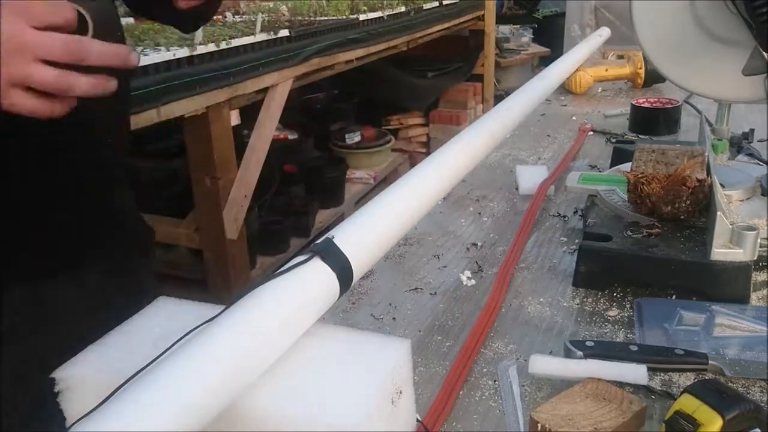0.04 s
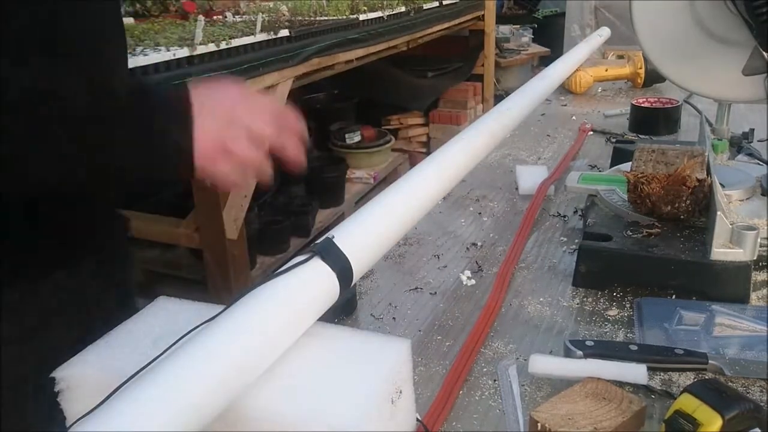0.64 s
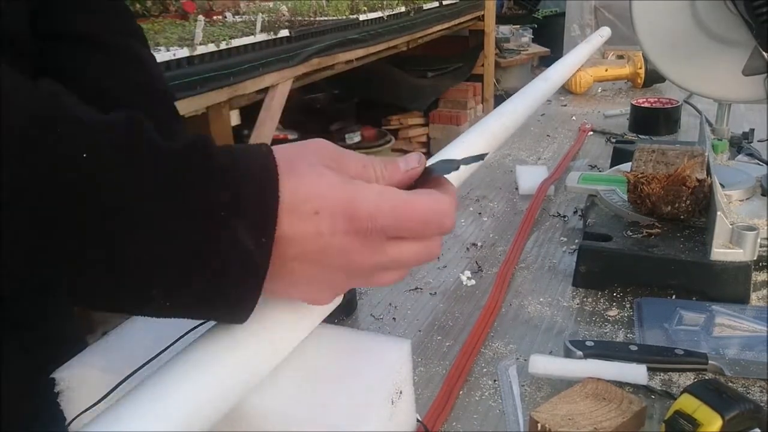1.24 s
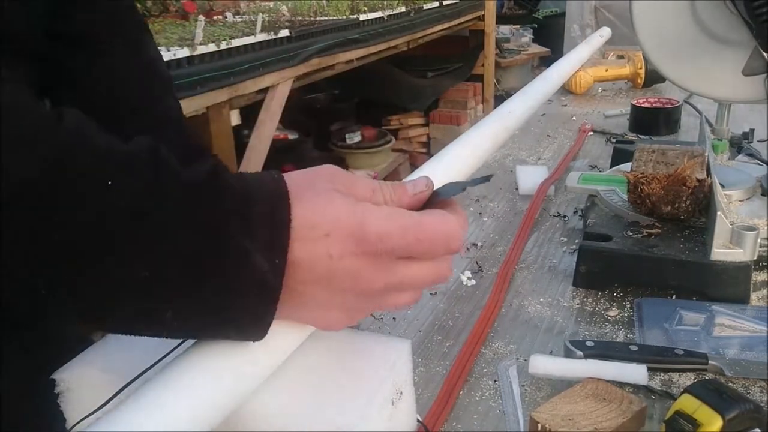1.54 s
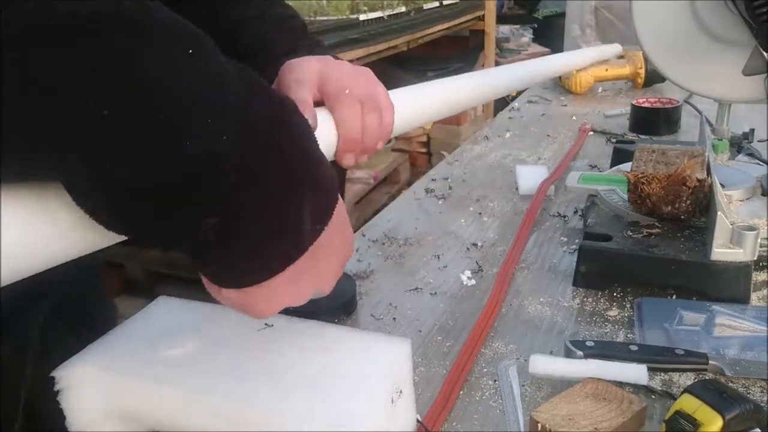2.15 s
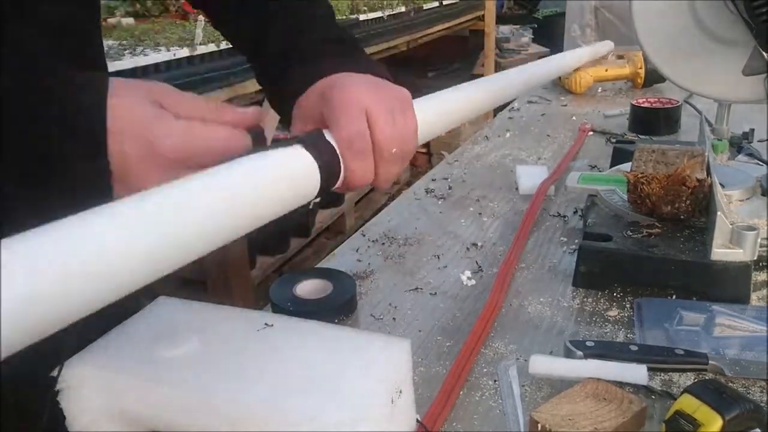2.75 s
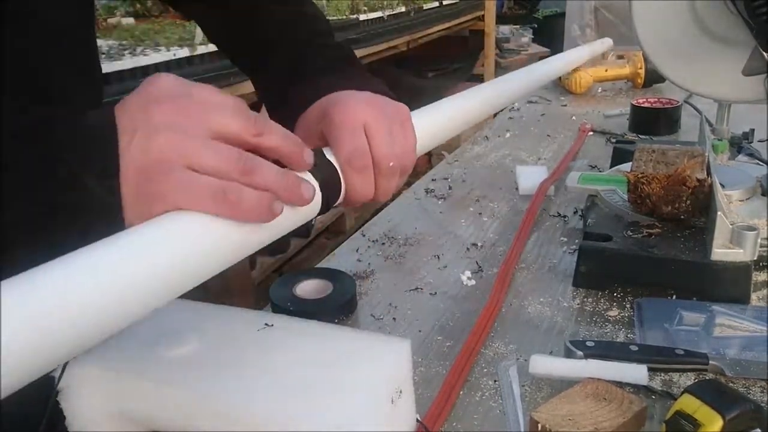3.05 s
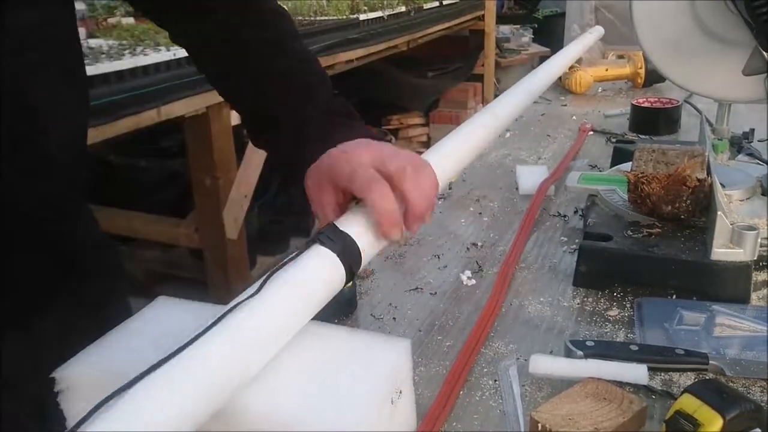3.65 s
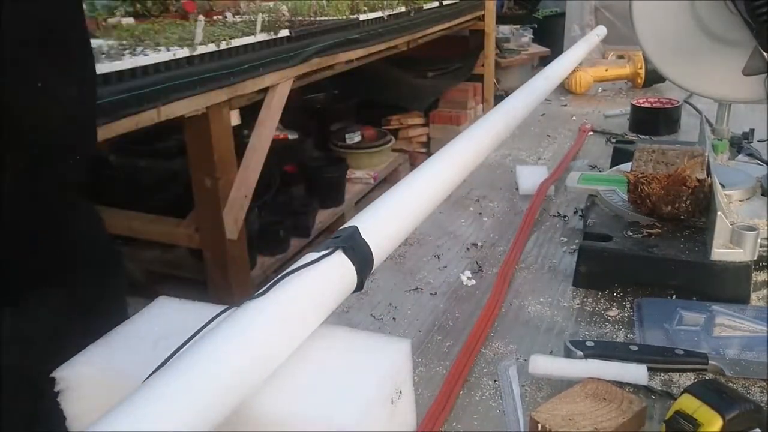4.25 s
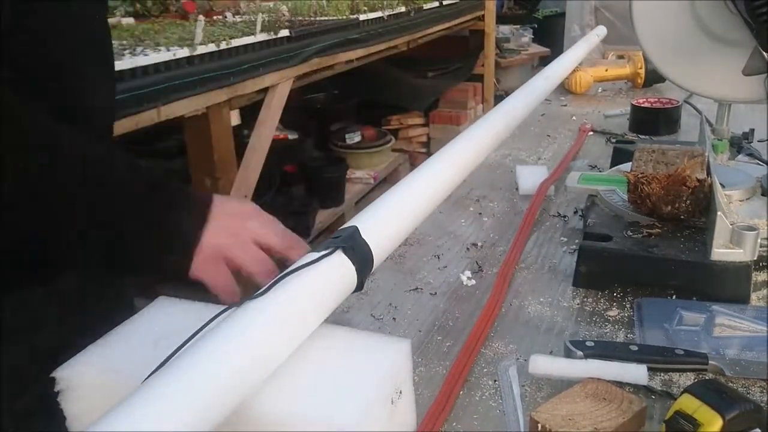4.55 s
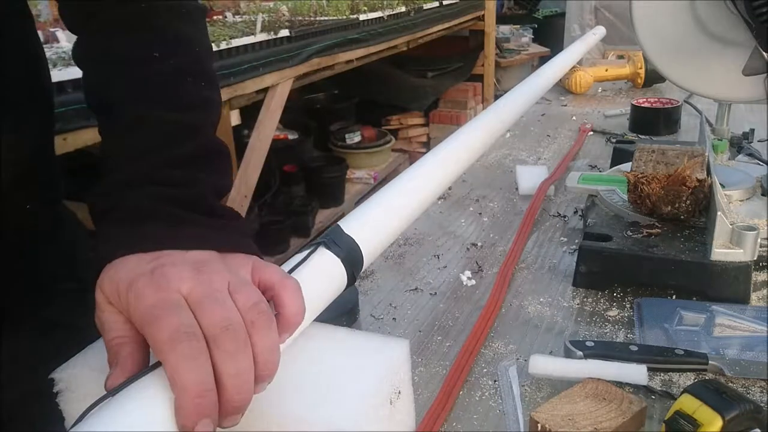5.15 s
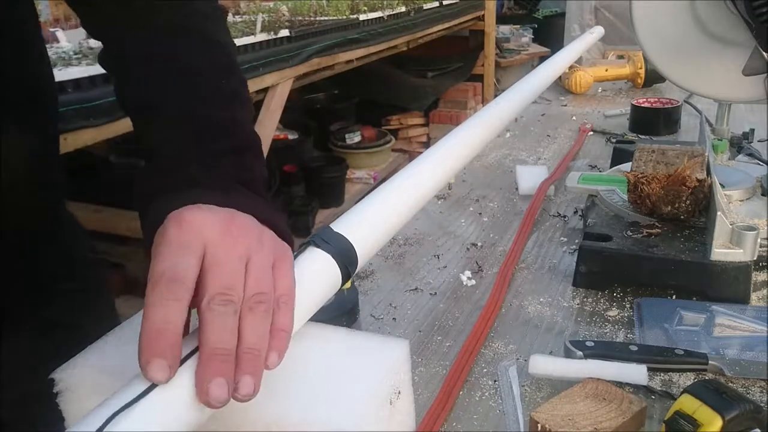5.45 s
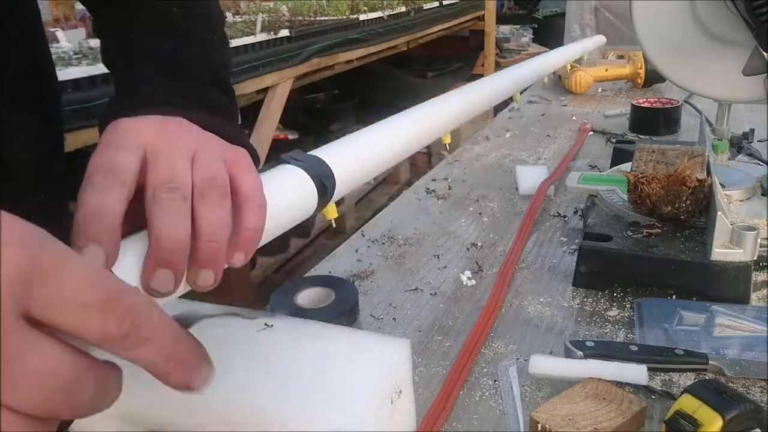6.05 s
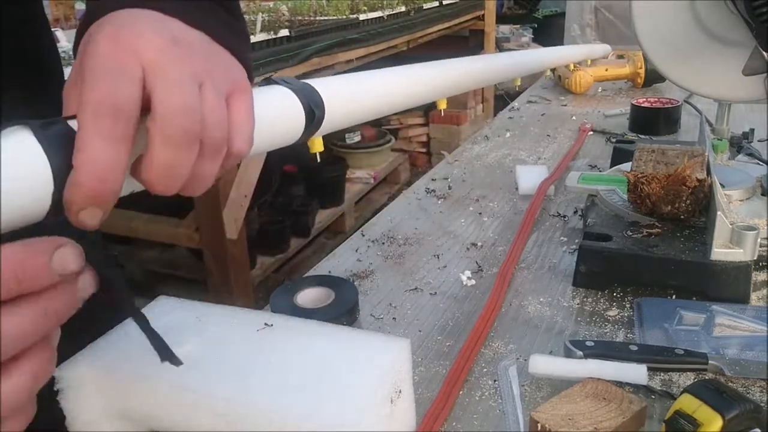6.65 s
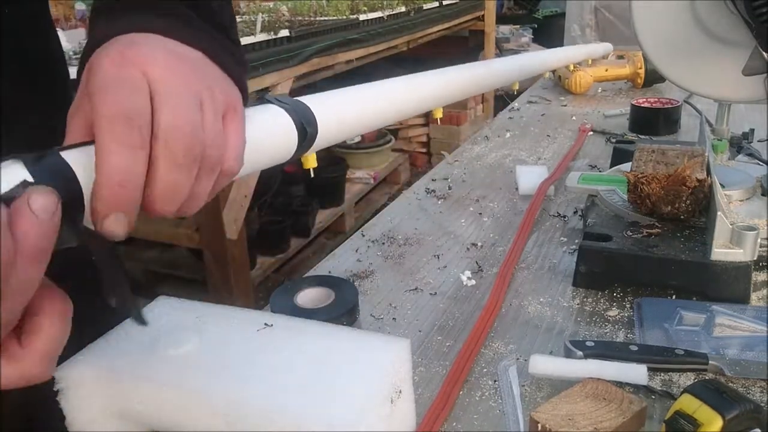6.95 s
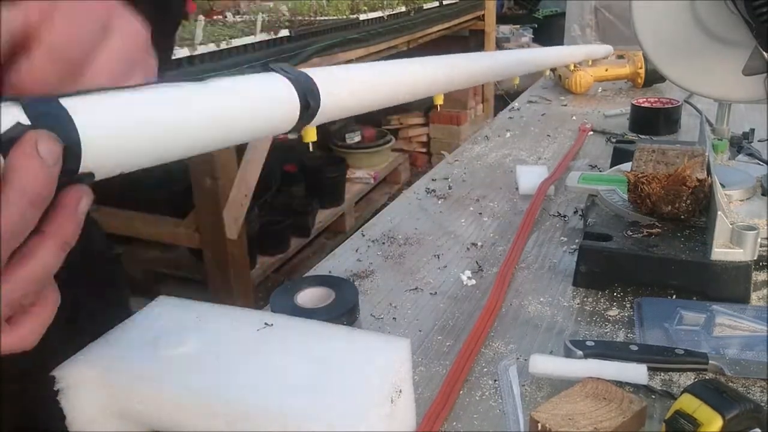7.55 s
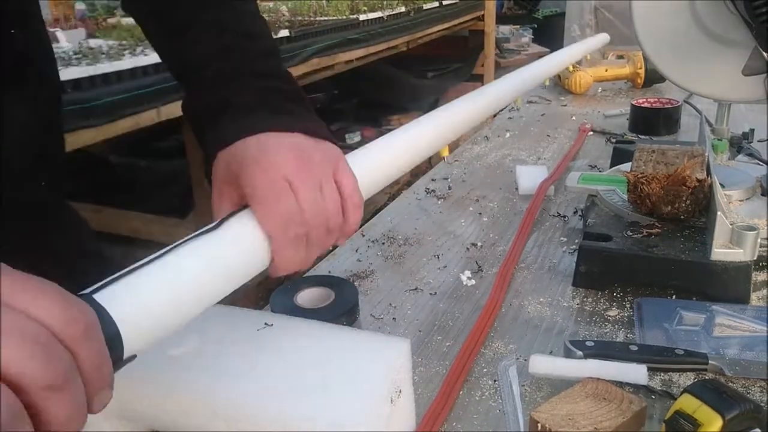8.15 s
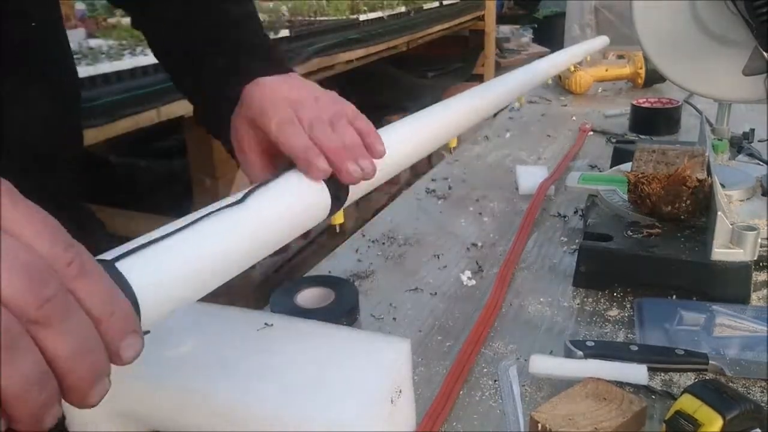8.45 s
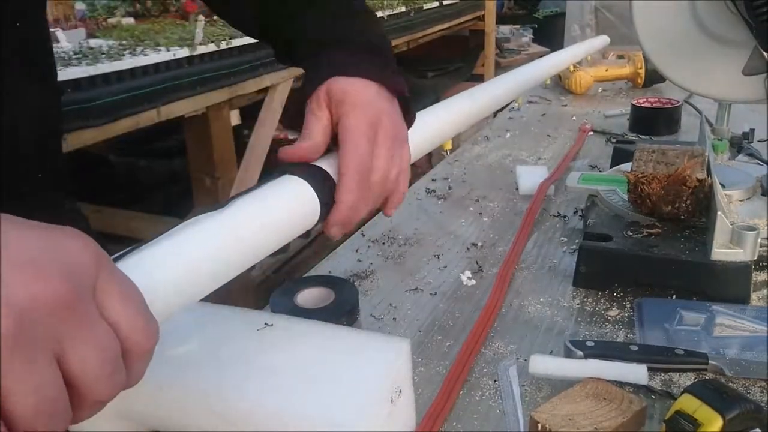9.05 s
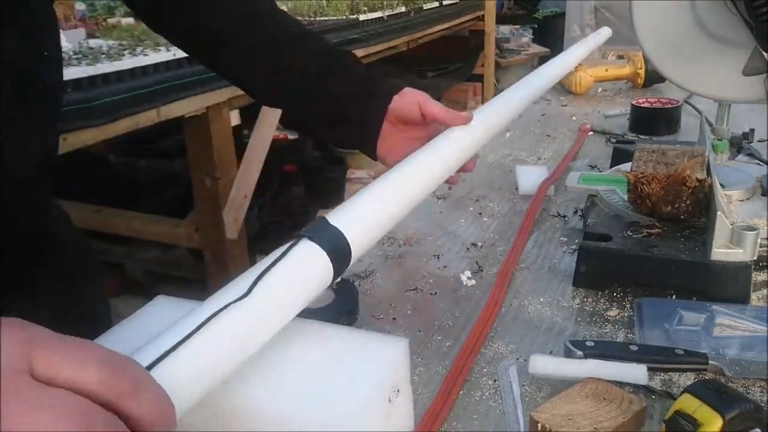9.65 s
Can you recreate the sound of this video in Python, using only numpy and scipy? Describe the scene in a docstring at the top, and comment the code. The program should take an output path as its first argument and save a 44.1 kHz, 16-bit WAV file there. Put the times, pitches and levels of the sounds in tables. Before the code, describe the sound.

Short tape rips, small clicks and two falling bird calls over faint distant traffic, ending in sharp squeaks of plastic rubbing on foam.

```python
"""Taping a plastic pipe at an outdoor workbench, over open air and distant traffic. Electrical tape
jerks off its roll, glue threads snapping; a bird gives a long falling cry as the roll drops on the
boards. Fingers press the strip round the pipe with ticks, scuffs and crinkle. Near 4 s come more rips
and a knock, near 6 s a second cry. At 9 s the pipe sticks and slips on its foam block, in short
groans and high squeals."""
import sys
import numpy as np
from scipy import signal
from scipy.fft import rfft, irfft
from scipy.io import wavfile
from scipy.ndimage import map_coordinates

SR = 44100
rng = np.random.default_rng(int(sys.argv[2]) if len(sys.argv) > 2 else 0)


def persist_wave(psi):
    """Save psi, clipped to +-1, as 16-bit WAV."""
    counts = np.round(np.clip(psi, -1, 1) * 32767).astype(np.int16)
    wavfile.write(sys.argv[1], SR, np.atleast_2d(counts).T)


N = 432180

# ring-out of the bench and nearby walls: (frequency [Hz], decay by 60 dB [s])
ECHO_DECAY = [(200, 0.22), (2000, 0.0933), (14000, 0.11)]
# EQ of the distant traffic: (frequency [Hz], gain [dB])
TRAFFIC_EQ = [(15, -66), (25, -43), (81, -40), (96, -30.5), (123, -24), (144, -12.5), (189, -3), (210, 2),
              (292, -1.5), (395, -9), (432, -6.5), (591, -17.5), (900, -27.5), (1170, -43), (1980, -120)]
# broad midrange EQ of both air and finger scuffs: (frequency [Hz], gain [dB])
HISS_EQ = [(300, -20), (600, 0.5), (1200, 1), (1900, -2.5), (2800, 0), (4200, -4), (6000, -12),
           (9000, -23.5)]
# faint gliding tones: (time [s], length [s], start pitch [Hz], end pitch [Hz], level [dB])
GLIDES = [(3.918, 0.448, 436.5, 348.5, -54), (4.70, 0.55, 560.7, 495, -62.5),
          (4.992, 0.957, 324.2, 393.7, -57.5), (6.596, 0.3588, 439, 356.2, -58.5),
          (8.5, 0.248, 2690, 2578, -58), (9.639, 0.059, 5420, 5327, -51.5)]

# the bird's short lead-in note: (time into note [s], pitch [Hz], gain [dB], roughness [0-1])
CHIP_SHAPE = [(0, 2635, -5.5, 1), (.007, 2782, -3, 0.89), (.022, 3028, 4, 0.12), (.038, 3009, 1, 0.3),
              (.048, 2800, -6, .7), (.058, 2790, -19, 1), (.08, 2794, -16.5, 0.8)]
# its long cries: (time [s], length [s], roughness of frayed end [0-1], fundamental there [dB])
BIRD_CRIES = [(0.54, 0.6813, 0.53, -59.5), (5.844, 0.6446, 0.24, -49.5)]

# fingers smoothing the tape down: (centre time [s], length [s], level [dB])
FINGER_PRESSES = [(0.147, 0.055, -60.5), (1.452, 0.79, -73.5), (2.134, 0.346, -71.5), (2.79, 0.21, -64.5),
                  (3.237, 0.099, -70), (3.6, 1, -70), (5.026, 0.274, -63), (5.59, 0.141, -61),
                  (6.423, 0.6, -71.5), (7.648, 0.33, -78.5), (8.162, 0.585, -59), (8.861, 0.352, -57.5),
                  (9.658, 0.19, -41)]
# bright EQ of crinkling tape: (frequency [Hz], gain [dB])
CRINKLE_EQ = [(2000, -8.5), (5000, -7), (8000, 1), (11000, 0.5), (15000, 0.5)]
# fingers scuffing the pipe: (time [s], length [s], level [dB])
FINGER_SCUFFS = [(1.535, 0.072, -53.5), (2.11, 0.049, -53.5), (2.729, 0.068, -52), (3.513, 0.0557, -54),
                 (3.606, 0.0606, -52), (3.722, 0.0473, -52.5), (3.849, .07, -52.5), (5.338, 0.0455, -46),
                 (5.541, 0.0654, -45), (8.014, 0.085, -51), (8.78, 0.302, -55.5), (9.584, 0.104, -46)]
# ticks of tape, blade and fingernails: (time [s], rough peak level [dB], top over mid layer [dB])
TICK_CUES = [(0.477, -29, 12.5), (0.4832, -20, 20), (0.493, -26, 17), (1.489, -25, 13.5),
             (1.5233, -18.5, 16), (1.6366, -27, -18.5), (1.7493, -30, 4), (2.7573, -27, 6.5),
             (2.774, -27.5, 5.5), (2.809, -30, 5), (3.2119, -31.5, 4.5), (3.3577, -32, 1),
             (3.6181, -28.5, -1.5), (3.9628, -31.5, 9), (4.179, -27, 14.5), (4.5188, -19, 9.5),
             (5.7152, -30.5, -20.5), (6.2398, -26.5, 9.5), (6.72, -30, 17.5), (6.762, -27, 9),
             (7.5184, -26.5, 5), (7.9356, -29.5, 7.5), (8.1121, -31.5, 3), (9.4575, -21, 17),
             (9.472, -17.5, 14.5), (9.6941, -20, 11)]
# a tick's mid layer: (frequency [Hz], gain [dB])
TICK_MID_EQ = [(400, -25), (1200, -12.5), (2100, -1.5), (2900, 2), (3700, -3.5), (5000, -3), (9000, -14.5)]
# a tick's top layer: (frequency [Hz], gain [dB])
TICK_TOP_EQ = [(3000, -36.5), (6000, -6.5), (9000, 1), (15000, -0.5)]
# roll and knife landing on the bench: (time [s], thump [dB], thud [dB], clack [dB])
KNOCK_CUES = [(0.667, -55, -48.5, -45.5), (0.7, -60, -50.5, -52.5), (2.133, -48.5, -56, -53),
              (4.647, -48.5, -43, -51), (4.675, -57, -43.5, -47.5)]
# resonances of the boards: (frequency [Hz], bandwidth [Hz], gain [dB])
BOARD_MODES = [(372, 107, -16.5), (548, 54, 3), (640, 230, 19), (853, 107, 8), (1140, 120, -4),
               (1480, 105, -23), (2233, 112, -9.5)]
# EQ of a knock's hard attack: (frequency [Hz], gain [dB])
CLACK_EQ = [(880, -25.5), (1500, -8.5), (2140, 3), (2870, -4.5), (5620, -1), (6640, -9.5), (13400, -14.5),
            (15800, -13)]
# jerks of tape off the roll: (time [s], hold [s], level [dB], low-end gain [dB])
RIP_CUES = [(.190, 0.00213, -19, -4.5), (.194, 0.02124, -26, -1.5), (4.209, .003, -23, -21.5),
            (4.2131, 0.00277, -16.5, -19.5), (4.221, 0.00224, -16, -23), (4.227, 0.00173, -13.5, -16),
            (4.288, 0.00264, -23, 3.5), (4.293, 0.00963, -18, -1), (4.302, 0.01264, -23, -15)]
# EQ of the taut strip: (frequency [Hz], gain [dB])
TAPE_EQ = [(240, -66.5), (400, -25), (729, -4.5), (1100, -15), (1520, -7.5), (1830, -11.5), (2530, -2),
           (3390, -6.5), (4910, -2.5), (5380, -6), (9080, -3.5), (10300, -7), (11300, -3.5), (15800, -2)]

# slow stick-slip as the pipe catches on the foam:
# (peak time [s], rise [s], fall [s], slip rate [Hz], tone [dB], rasp [dB])
GROAN_CUES = [(9.056, 0.00355, 0.0043, 1241, -33, -49), (9.116, 0.00533, .008, 1381, -6, -14.5),
              (9.196, .005, 0.01004, 1293, -6.5, -11.5), (9.211, 0.015, 0.0276, 1030, -46.5, -26),
              (9.232, .006, 0.0063, 1286, -12, -11.5), (9.279, .005, 0.0191, 1020, -16.5, -17),
              (9.356, 0.0051, 0.0063, 1110, -21, -21.5), (9.408, .011, 0.01956, 828.2, -19.5, -24.5),
              (9.495, 0.00477, 0.0026, 999, -24, -30), (9.527, 0.0089, 0.01016, 1318, -26.5, -21.5),
              (9.545, 0.0038, 0.01005, 559, -33, -47.5)]
# a groan's overtones: (frequency [Hz], level against the fundamental [dB])
GROAN_PARTIALS = [(1200, -5.5), (1600, -8), (1950, -2), (2600, -14.5), (3800, -21.5), (5100, -11),
                  (6200, -31), (7600, -26), (9200, -20.5), (11000, -30), (13000, -25), (15400, -27.5)]
# the foam's duller ring under slow slips: (frequency [Hz], gain [dB])
GROAN_RASP_EQ = [(40, -19.5), (300, -6), (1500, 4), (2500, -2), (3600, -3), (5100, -6.5), (6000, -8),
                 (7400, -2), (8300, -4), (9300, 2.5), (11300, -12), (13000, -8.5), (15500, -8)]
# fast stick-slip as it breaks free: (time [s], length [s], start pitch [Hz], mid pitch [Hz],
# end pitch [Hz], arch flatness [exponent], overshoot [share], tone [dB], rasp [dB], opening burst [dB])
SQUEAL_CUES = [(9.124, 0.0685, 2403, 2559, 2208, 3.6, .33, -11.5, -14.5, -9.5),
               (9.2369, 0.0367, 3400, 3795, 2184, 1.6, 0.042, -8, -21.5, -12),
               (9.3594, .040, 2542, 2440, 2105, 2.01, 0.17, -28.5, -19.5, -13),
               (9.499, 0.0264, 2801, 3309, 3067, 2.3, 0.11, -25, -20, -21)]
# a squeal's overtones: (frequency [Hz], level against the fundamental [dB])
SQUEAL_PARTIALS = [(1200, -3), (2400, -14.5), (3800, -37.5), (5100, -5), (6200, -43), (7500, -15),
                   (9200, -25), (11700, -33.5), (12900, -3), (14200, -12), (15400, -9)]
# the foam's ring under fast slips: (frequency [Hz], gain [dB])
SQUEAL_RASP_EQ = [(40, -21), (300, -7), (1500, -4), (2500, 1.5), (3600, -1), (5100, -9), (6000, -13),
                  (7400, -2.5), (8300, -16), (9300, -10), (11300, -15.5), (13000, 4.5), (14200, 0),
                  (15500, 2.5)]

TOP_HZ = 15900  # band limit


def amp(db):
    """Decibels to gain."""
    return 10 ** (np.asarray(db) / 20)


def unit(x):
    """Normalise to an RMS of one."""
    return x / np.sqrt(np.mean(x ** 2) + 1e-20)


def along(points, hz):
    """Read a curve of (Hz, value) points on a log frequency axis."""
    freqs, values = np.transpose(points)
    return np.interp(np.log(hz + 1), np.log(np.sort(freqs) + 1), values)


def automation(rows):
    """Turn rows of (time, values...) into one sample-by-sample lane per value."""
    times, *columns = np.transpose(rows)
    t = np.arange(times[0], times[-1] + 2 / SR, 1 / SR)
    return [np.interp(t, times, column) for column in columns]


def add(track, s, x):
    """Mix x in at s seconds."""
    part = track[max(round(s * SR), 0):][:len(x)]
    part += x[:len(part)]


def wobble(rate, n):
    """Smooth random modulation, rate knots a second."""
    return map_coordinates(rng.standard_normal(int(n * rate / SR) + 4), [np.arange(n) * rate / SR])


def eq(x, points, size=4096):
    """Minimum-phase EQ of unit energy, shaped like the (Hz, dB) points."""
    cepstrum = irfft(np.log(amp(along(points, np.fft.rfftfreq(size, 1 / SR)))))
    cepstrum[1:size // 2] *= 2
    cepstrum[size // 2 + 1:] = 0
    kernel = irfft(np.exp(rfft(cepstrum)))
    return signal.fftconvolve(x, kernel / np.linalg.norm(kernel))[:len(x)]


def low_cut(x, hz, order=2):
    """Roll off the lows below hz."""
    return signal.sosfilt(signal.butter(order, hz, "high", fs=SR, output="sos"), x)


def grains(n, spread_db):
    """Noise made of tiny snaps of unequal size; more spread, more grit."""
    return unit(rng.standard_normal(n) * amp(spread_db * np.clip(rng.standard_normal(n), -3, 3)))


def traffic(mid_scene_db=-50, fade_db_per_s=0.1423):
    """A low rush from far away that slowly recedes."""
    db = mid_scene_db - fade_db_per_s * (np.arange(N) - N / 2) / SR
    return amp(db + 1.2 * wobble(6, N)) * eq(rng.standard_normal(N), TRAFFIC_EQ)


def air(db=-59):
    """The soft, even hiss of the open air."""
    return low_cut(amp(db + 0.37 * wobble(3, N)) * eq(rng.standard_normal(N), HISS_EQ), hz=150)


def faint_whistles():
    """Thin gliding tones that fade in and out, barely above the air."""
    out = np.zeros(N)
    for s, length, from_hz, to_hz, db in GLIDES:
        n = int(length * SR)
        hz = np.linspace(from_hz, to_hz, n) * (1 + .008 * wobble(300, n))
        tone = np.sqrt(2) * np.sin(2 * np.pi * np.cumsum(hz) / SR)
        add(out, s, amp(db) * np.sin(np.linspace(0, np.pi, n)) * tone)
    return out


def wall_echo(send):
    """Bench and nearby walls answer with a short tail, longest in the lows."""
    hz, t, spectrum = signal.stft(rng.standard_normal(SR // 4), SR, nperseg=256)
    decay = amp(-60 * t / along(ECHO_DECAY, hz)[:, None])
    _, tail = signal.istft(spectrum * decay, SR, nperseg=256)
    return signal.fftconvolve(send, tail / np.linalg.norm(tail))[:N]


def syrinx(hz, fundamental_db, octave_db, rough, upper_db):
    """The bird's voice, with a strong octave; when hoarse it doubles its period and flutters."""
    n = len(hz)
    phase = 2 * np.pi * np.cumsum(hz * (1 + (.001 + .018 * rough) * wobble(1100, n))) / SR
    upper = amp(-34.5) * np.sin(3 * phase) + amp(-25.5) * np.sin(4 * phase)
    upper += amp(-22.5) * np.sin(5 * phase)
    upper *= amp(upper_db + 3 * wobble(18, n))
    tone = amp(fundamental_db + 1.6 * wobble(27.8, n)) * np.sin(phase)
    tone += amp(octave_db + 0.8 * wobble(43, n)) * (np.sin(2 * phase) + upper)
    doubling = .5 * np.sqrt(rough) * np.clip(.6 + .5 * wobble(30, n), 0, 1) * np.sin(phase / 2)
    flutter = .7 * np.sin(.19 * phase + 1.2 * wobble(250, n)) + .45 * wobble(1500, n)
    return np.sqrt(2) * tone * (1 + doubling + rough * flutter)


def cry(length, end_rough, end_db, pitch_hz=3165.2, sag_hz_per_s=620, fray_at_s=0.5224):
    """A long whistle that scoops up hoarse, clears, sinks and frays at its end."""
    t = np.arange(int(length * SR)) / SR
    scoop, droop = np.exp(-t / .008), np.exp((t - length) / 0.02587)
    hz = pitch_hz - sag_hz_per_s * t - 489.5 * scoop - 263.5 * droop
    hz *= 1 + 0.0057 * np.exp(-t / 0.148) * wobble(70.83, len(t))  # early waver
    fray = np.clip((t - fray_at_s) / 0.017, 0, 1)
    clear_db = -42.5 - 65.5 * np.maximum(t - 0.2335, 0)  # holds, then fades
    fundamental_db = (1 - fray) * clear_db + fray * end_db
    octave_db = -42 + 7 * np.exp(-(t / 0.178) ** 2) - 3.5 * fray  # starts strong, settles, weakens
    rough = 0.435 * (np.exp(-(t / 0.048) ** 2) + droop) + end_rough * fray
    gate = np.minimum(t / 0.0132, 1) * np.minimum((length - t) / 0.0229, 1)
    return gate * syrinx(hz, fundamental_db, octave_db, np.clip(rough, 0, 1), upper_db=-5.5 * t)


def bird(chip_lead_s=0.074):
    """Each call is a hoarse chip running into a long cry."""
    out = np.zeros(N)
    hz, swell_db, rough = automation(CHIP_SHAPE)
    for s, length, end_rough, end_db in BIRD_CRIES:
        add(out, s - chip_lead_s, syrinx(hz, swell_db - 47.5, swell_db - 42, rough, upper_db=2.5))
        add(out, s, cry(length, end_rough, end_db))
    return low_cut(out, hz=2100, order=8)  # the small throat passes nothing low


def tape_crinkle(rest_db=-69, pops_per_s=34):
    """Sticky tape crinkles in clumps and glue threads pop, swelling under each press."""
    pressure = np.full(N, amp(rest_db))
    for s, length, db in FINGER_PRESSES:
        add(pressure, s - length / 2, amp(db) * np.hanning(int(length * SR)))
    clumps = unit(amp(3 * wobble(14, N) + 3 * wobble(300, N)))
    triggers = (rng.random(N) < pops_per_s / SR) * rng.random(N)
    pops = signal.fftconvolve(triggers, np.geomspace(1, .001, SR // 80))[:N] * rng.standard_normal(N)
    return pressure * eq(clumps * grains(N, spread_db=2) + amp(-2) * unit(pops), CRINKLE_EQ)


def scuffs():
    """Skin drags over plastic in short, gritty swells."""
    out = np.zeros(N)
    for s, length, db in FINGER_SCUFFS:
        n = int(length * SR)
        add(out, s, amp(db) * np.hanning(n) * eq(grains(n, spread_db=11), HISS_EQ))
    return low_cut(out, hz=400)


def ticks(snap_t60_s=0.0062, tail_t60_s=0.0627, crest_db=27.5):
    """Tape, blade and fingernails tick: a sharp snap with a short crackling tail."""
    out, t = np.zeros(N), np.arange(SR // 10) / SR
    fade = amp(-60 * t / snap_t60_s) + 0.49 * amp(-60 * t / tail_t60_s)
    for s, peak_db, top_db in TICK_CUES:
        mid = unit(eq(fade * grains(len(t), spread_db=2.5), TICK_MID_EQ))
        top = unit(eq(fade * grains(len(t), spread_db=2.5), TICK_TOP_EQ))
        add(out, s, amp(peak_db - crest_db) * unit(mid + amp(top_db) * top))
    return low_cut(out, hz=300)


def knocks(thump_hz=390):
    """Roll and knife land: a hollow thud of the boards, a low thump of the whole top, a hard clack."""
    out, t = np.zeros(N), np.arange(SR // 6) / SR
    for s, thump_db, thud_db, clack_db in KNOCK_CUES:
        impact = rng.standard_normal(len(t)) * amp(-60 * t / 0.042)
        boards = sum(amp(db + rng.normal(0, 1.46)) * np.exp(-np.pi * width * t)
                     * np.cos(2 * np.pi * hz * t) for hz, width, db in BOARD_MODES)
        thud = low_cut(signal.fftconvolve(impact, boards)[:len(t)], hz=303)
        tone = np.sin(2 * np.pi * thump_hz * (1 + 0.297 * rng.normal()) * t)
        thump = low_cut(tone * amp(-60 * t / 0.067) * (1 - np.exp(-t / 0.00133)), hz=179)
        burst = rng.standard_normal(len(t)) * amp(-60 * t / 0.032)
        clack = low_cut(eq(burst, CLACK_EQ), hz=700)
        add(out, s, amp(thump_db) * unit(thump) + amp(thud_db) * unit(thud) + amp(clack_db) * unit(clack))
    return out


def tape_rips(stop_t60_s=0.0061, ring_t60_s=0.0615):
    """Glue threads snap in a dense volley; the taut strip rings briefly after each jerk."""
    out, t = np.zeros(N), np.arange(SR // 10) / SR
    for s, hold, db, low_db in RIP_CUES:
        after = np.maximum(t - hold, 0)
        peel = amp(-60 * after / stop_t60_s) + 0.266 * amp(-60 * after / ring_t60_s)
        snaps = peel * unit(np.tanh(.2 * grains(len(t), spread_db=6)))
        colour = [(hz, gain + low_db * np.exp(-hz / 1800)) for hz, gain in TAPE_EQ]
        add(out, s, amp(db) * eq(snaps, colour))
    return out


def overtones(hz, colour):
    """Harmonics 2 to 10 of a slip cycle, each as strong as the colour at its frequency."""
    phase = 2 * np.pi * np.cumsum(hz) / SR
    return sum(amp(along(colour, k * hz)) * (k * hz < TOP_HZ)
               * np.sin(k * phase + rng.uniform(0, 2 * np.pi)) for k in range(2, 11))


def stick_slip(hz, tone_db, rasp_db, partials, rasp_eq):
    """Plastic grips and slips on foam: a jittery tone with a rasp on top."""
    n = len(hz)
    # rasping slips and slow slips keep time badly
    chaos = amp(np.minimum(rasp_db - tone_db, 6))
    rate = hz * (1 + 0.017 * chaos ** 2 * wobble(900, n) + 0.012 * wobble(143, n))
    rate += 35 * (1000 / hz) * wobble(800, n)
    phase = 2 * np.pi * np.cumsum(rate) / SR
    tone = np.sqrt(2) * amp(tone_db) * (np.sin(phase) + overtones(rate, partials))
    # side patches slip at rates of their own
    patch_rates = (hz * rng.uniform(0.68, 1) * (1 + 0.01589 * wobble(250, n)) for _ in range(4))
    patches = unit(sum(overtones(patch_hz, rasp_eq) for patch_hz in patch_rates))
    # every slip throws off a puff of noise; the contact colours each stroke a little differently
    colour = [(f, db + rng.normal(0, 1.1)) for f, db in rasp_eq] + [(TOP_HZ, 0), (TOP_HZ + 441, -40)]
    puffs = eq(unit(np.exp(0.795 * np.cos(phase))) * rng.standard_normal(n), colour)
    grip = unit(amp(2.5 * wobble(462, n)))  # changes from moment to moment
    return tone + grip * amp(rasp_db) * (amp(-6) * puffs + amp(-4.5) * patches)


def pipe_groans(sag_share=.22):
    """The pipe catches on the foam: a low slip swells, then sags in pitch as it dies."""
    out = np.zeros(N)
    for s, rise, fall, hz, tone_db, rasp_db in GROAN_CUES:
        t = np.arange(-2 * rise, 2 * fall, 1 / SR)
        spent = (np.maximum(t, 0) / fall) ** 1.684
        swell_db = -20 * (spent + (np.minimum(t, 0) / rise) ** 2)
        rate = hz * (1 - sag_share) ** spent
        groan = stick_slip(rate, tone_db + swell_db, rasp_db + swell_db, GROAN_PARTIALS, GROAN_RASP_EQ)
        add(out, s + t[0], groan)
    return out


def pipe_squeals(burst_s=.003, attack_s=0.0027, release_s=0.019, rasp_fade_db=9.5):
    """The pipe breaks free with a burst of rasp, and a high squeal bends in pitch with its speed."""
    out = np.zeros(N)
    for cue in SQUEAL_CUES:
        s, length, start_hz, mid_hz, end_hz, flatness, overshoot, tone_db, rasp_db, burst_db = cue
        t = np.arange(-2 * burst_s, length + attack_s, 1 / SR)
        position = np.clip(2 * t / length - 1, -1, 1)
        hz = mid_hz + (np.where(position < 0, start_hz, end_hz) - mid_hz) * np.abs(position) ** flatness
        # the slip rate overshoots and swings before it settles
        hz *= 1 + overshoot * np.exp(-np.abs(t) / .007) * np.cos(2 * np.pi * t / .0095)
        attack = np.maximum(1 - t / attack_s, 0)
        release = np.maximum(1 + (t - length) / release_s, 0)
        swell_db = -10 * attack ** 2 - 11 * release ** 2
        rasp = amp(rasp_db + swell_db / 2 - rasp_fade_db * position / 2)
        rasp += amp(burst_db - 10 * (t / burst_s) ** 2)
        squeal = stick_slip(hz, tone_db + swell_db, 20 * np.log10(rasp), SQUEAL_PARTIALS, SQUEAL_RASP_EQ)
        add(out, s + t[0], squeal)
    return out


def scene():
    """Mono mix: handwork and pipe nearly dry, the bird wetter, crinkle and ambience without echo."""
    handwork = tape_rips() + knocks() + ticks() + scuffs()
    pipe = pipe_groans() + pipe_squeals()
    calls = bird()
    echo = wall_echo(amp(-21.5) * handwork + amp(-21) * pipe + amp(-4) * calls)
    return (handwork + pipe + calls + echo + faint_whistles() + tape_crinkle() + air() + traffic())[None]


def record(dry, ceiling=.8):
    """The microphone rounds off the loudest peaks and rolls off steeply at its band limit."""
    soft = dry / (1 + np.abs(dry / ceiling) ** 8) ** (1 / 8)
    edge = np.clip((TOP_HZ - np.fft.rfftfreq(N, 1 / SR)) / 500 + .5, 0, 1)
    return irfft(rfft(soft) * np.sin(np.pi / 2 * edge) ** 2, N)


dry = scene()
out = record(dry)
persist_wave(out)
```